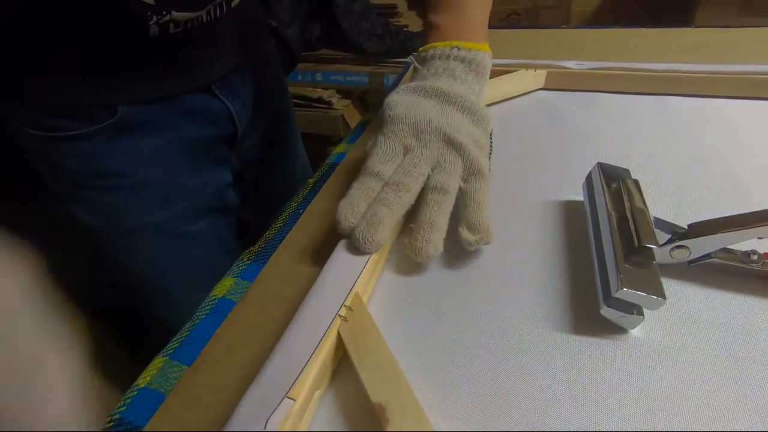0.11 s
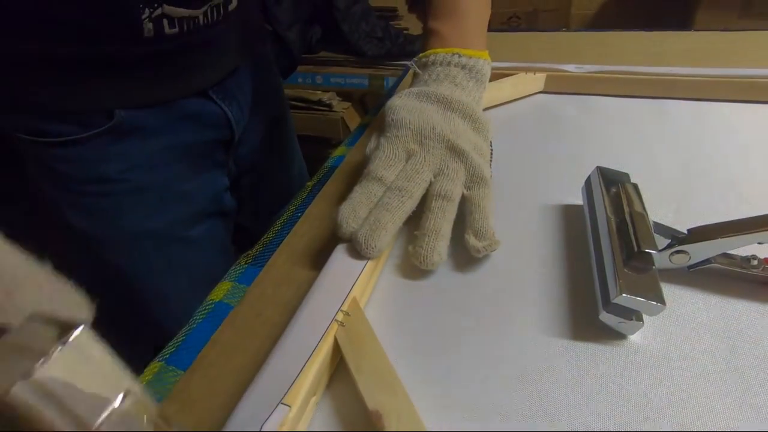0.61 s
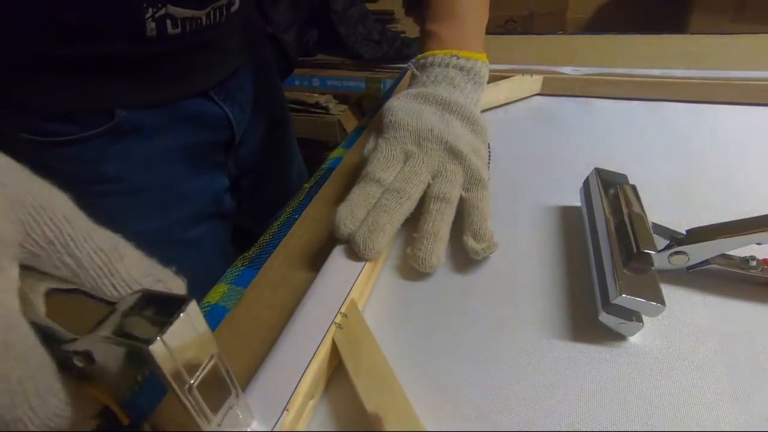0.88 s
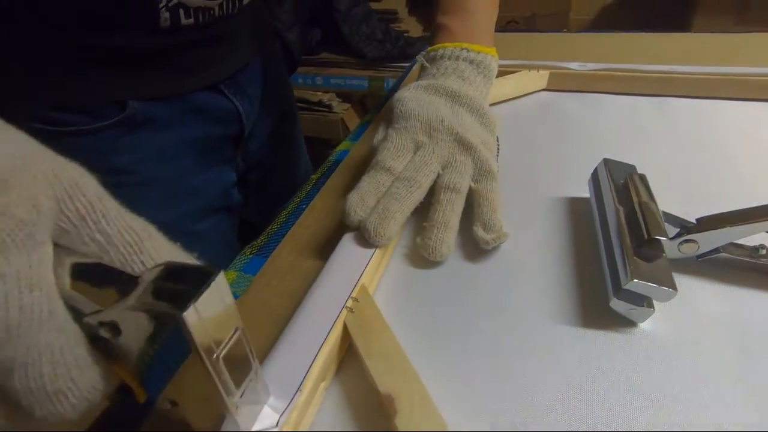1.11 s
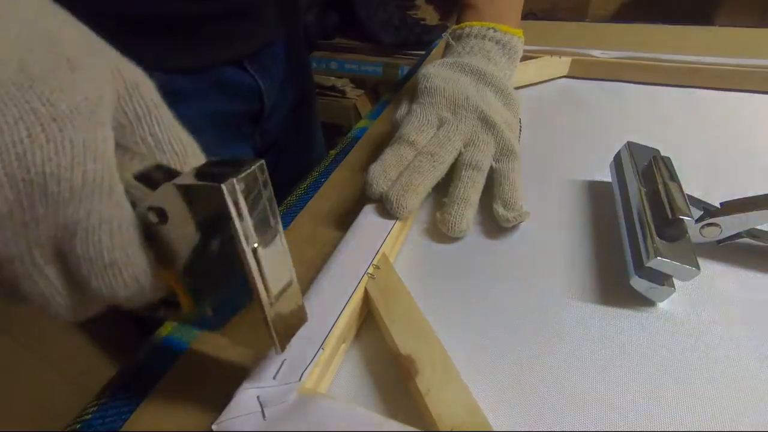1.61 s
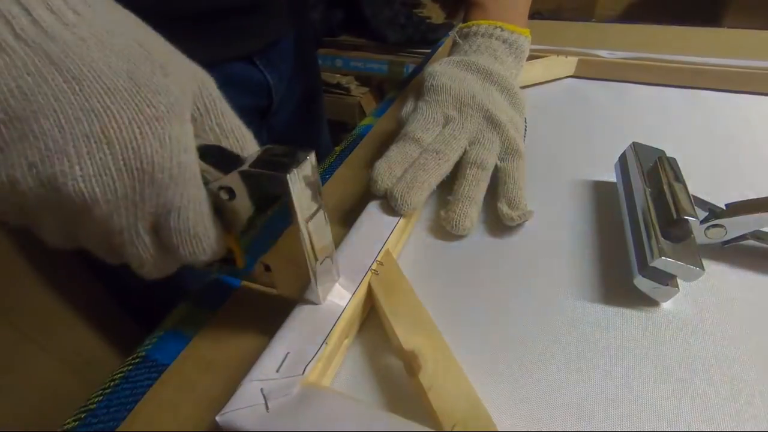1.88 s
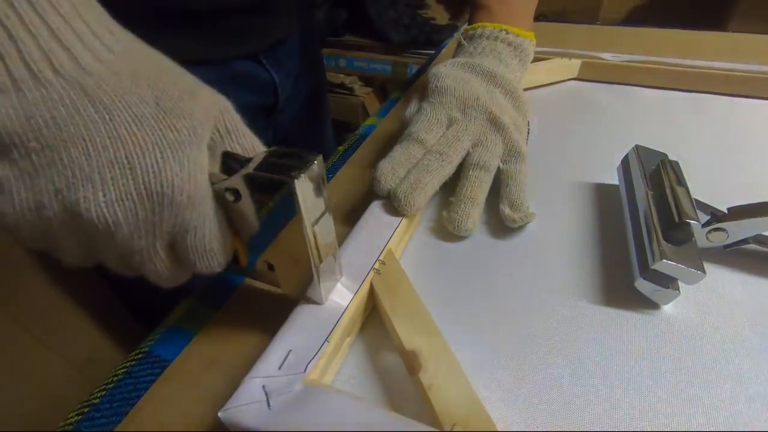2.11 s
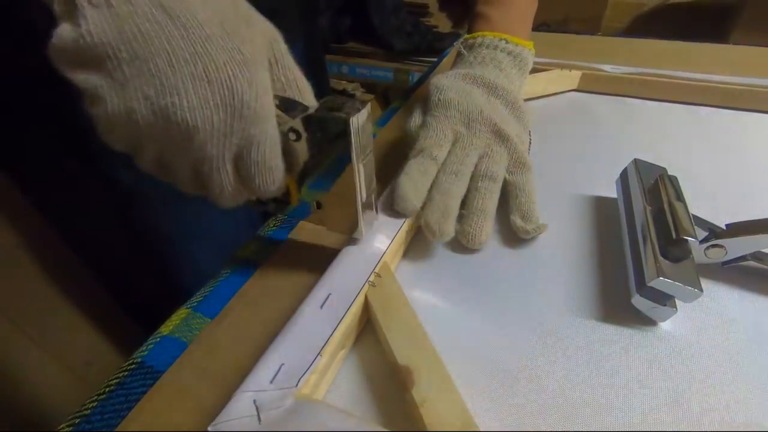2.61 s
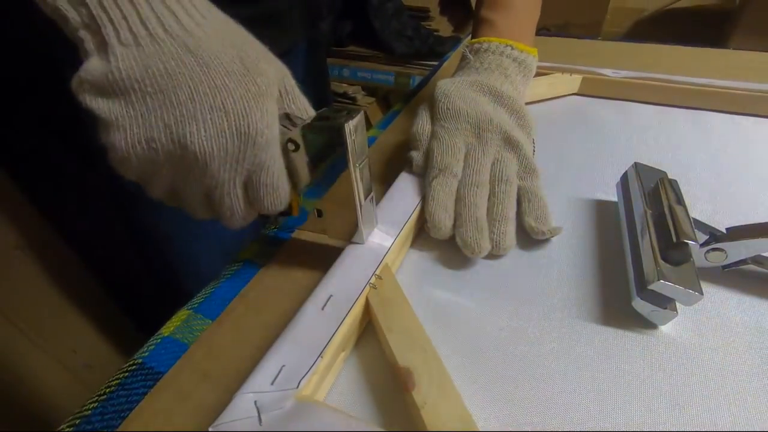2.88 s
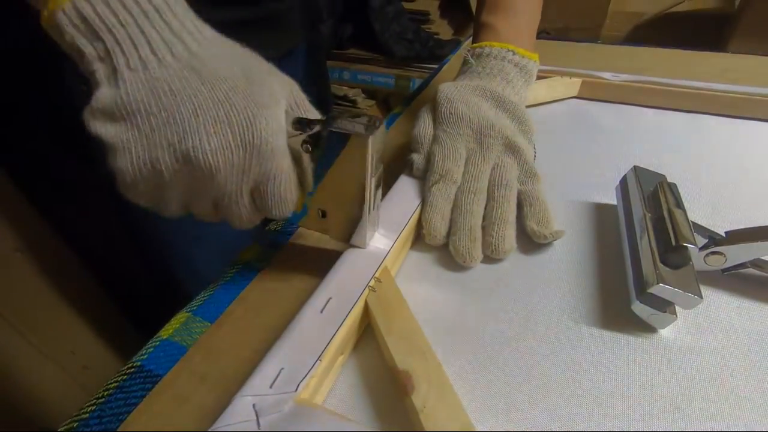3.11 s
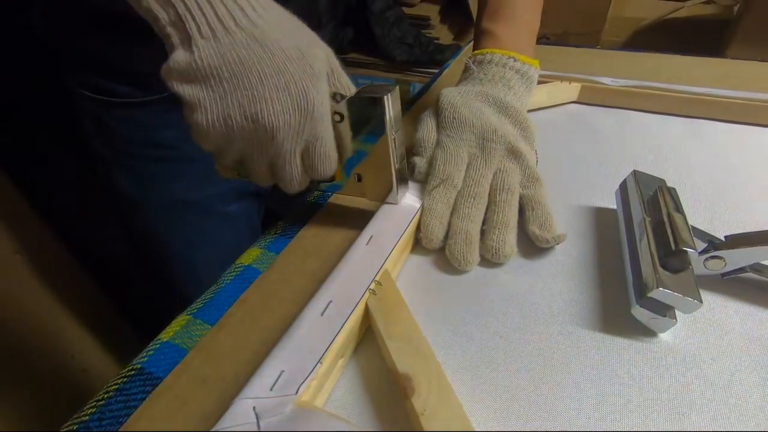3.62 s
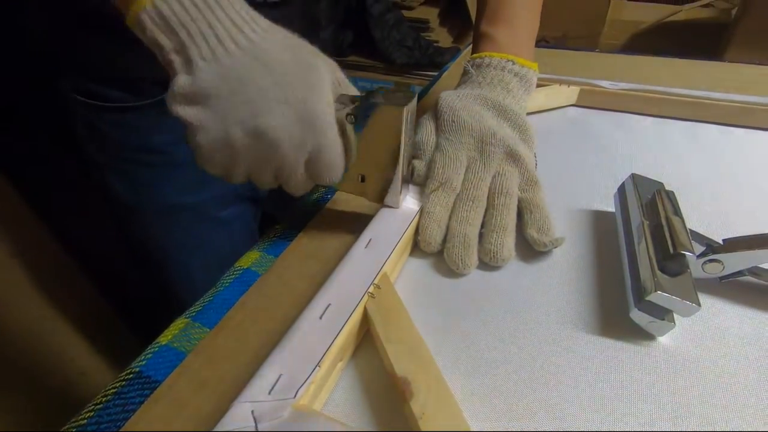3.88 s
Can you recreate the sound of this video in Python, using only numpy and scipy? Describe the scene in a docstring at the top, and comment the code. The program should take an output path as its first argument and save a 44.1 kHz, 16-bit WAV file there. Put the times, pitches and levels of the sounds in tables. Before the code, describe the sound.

A hand staple gun fires four loud, sharp cracks into a wooden frame, with metallic clicks between.

```python
"""In a faintly echoing room, close to a small recorder, a hand stapler is worked on a wooden frame on a table.
It is set down, squeezed, fired and let go, four times. Each shot is a shaped noise crack, ringing table modes
and a dying hiss; metal clicks are gritty bursts, landings ring the table, the lever scrape rings metal modes.
Gloves and cloth rustle as coloured grains, with a falling squeak and narrow creaks; deep swings shake the
recorder. A machine hums as wavering sines over room air, and decaying noise tails answer the work."""
import sys
import numpy as np
from scipy import signal
from scipy.fft import rfft, irfft
from scipy.io import wavfile
from scipy.ndimage import uniform_filter1d

SR = 44100
rng = np.random.default_rng(int(sys.argv[2]) if len(sys.argv) > 2 else 0)


def volts_from_decibels(level):
    """Turn decibel levels (scalar or array-like) into linear amplitude factors."""
    exponent = np.asarray(level, float) / 20
    return 10 ** exponent


def to_wav(s):
    """Save 16-bit WAV."""
    ch = np.atleast_2d(s).T  # columns
    pcm = np.round(np.clip(ch, -1, 1) * 32767)  # PCM
    wavfile.write(sys.argv[1], SR, pcm.astype(np.int16))


N = 176400


def curve(rows, t):
    """Straight lines through (s, dB) rows."""
    rows = np.array(rows, float)
    return np.interp(t, rows[:, 0], rows[:, 1])


def colour(x, table):
    """Filter by (Hz, dB) points on a log frequency axis, then scale to rms 1."""
    rows = np.array(table, float)
    hz = np.arange(N // 2 + 1) * SR / N + 1
    gain = volts_from_decibels(np.interp(np.log(hz), np.log(rows[:, 0] + 1), rows[:, 1]))
    y = irfft(rfft(x) * gain, N)
    return y / np.std(y)


def band(x, hz, width_hz):
    """Two-pole resonance that passes one band."""
    return signal.lfilter(*signal.iirpeak(min(hz, .44 * SR), max(hz / width_hz, .3), fs=SR), x)


def decay(t, t60):
    """Exponential decay that falls 60 dB in t60 seconds."""
    return 1000. ** (-t / t60)


def add(out, x, s):
    """Mix x in at time s."""
    i = int(s * SR)
    out[i:i + len(x)] += x[:N - i]


def grains(t, curves, table, grain_db, patchy_db):
    """Friction as dense tiny grains of uneven strength, in 2 ms patches, following level curves."""
    patch = np.repeat(rng.standard_normal(N // 88 + 1), 88)[:N]
    noise = rng.standard_normal(N) * volts_from_decibels(grain_db * rng.exponential(1, N) + patchy_db * patch)
    gain = 0
    for rows in curves:
        fade_in, fade_out = (rows[0][0] - .01, -100), (rows[-1][0] + .017, -100)
        gain = gain + volts_from_decibels(curve([fade_in] + list(rows) + [fade_out], t))
    return colour(noise, table) * gain


# hum of the machine, before it wavers: pitch_hz, level_db (rms)
HUM = [(140.0, -65), (193.8, -49), (290.7, -68)]
# spectrum of the room air: freq_hz, relative_db
AIR = [(15, -66.5), (25, -15.5), (109, -24), (202, -12.5), (286, -22.5), (475, -35), (655, -29),
       (1000, -42.5), (8780, -55.5), (15000, -70.5)]
# gain of the whole background, which sinks around the first shot and later returns: time_s, gain_db
BACKGROUND = [(0, -1), (.6, -1.5), (1.4, -1), (1.8, -10), (1.93, -13.5), (2.2, -5.5), (2.7, -5.5),
              (3.0, -7.5), (3.5, -15), (3.75, -2.5), (4, -3)]


def background(t):
    """Machine hum wavers alike in both channels, over partly separate room air on each side."""
    air_db, waver_db, side_share = -59, 2.8, 0.66
    steps = np.repeat(rng.standard_normal((2, N // 2205 + 1)), 2205, axis=1)
    waver = uniform_filter1d(steps, 4410, axis=1)[:, :N]
    drift_s = np.cumsum(0.001 * waver[1]) / SR
    hum = 0
    for hz, db in HUM:
        hum = hum + np.sqrt(2) * volts_from_decibels(db + waver_db * waver[0]) * np.sin(2 * np.pi * hz * (t + drift_s))
    mid, side = (colour(rng.standard_normal(N), AIR) for _ in range(2))
    air = volts_from_decibels(air_db) * (mid + side_share * side * np.array([[1], [-1]]))
    return (hum + air) * volts_from_decibels(curve(BACKGROUND, t))


# bands of the room's answer: freq_hz, t60_s, level_db (of the whole tail)
ROOM = [(307, 0.2, -19.5), (710, 0.85, -38.5), (1530, 0.17, -23), (3240, 0.5, -35), (4730, 0.66, -37),
        (7860, 0.87, -37.5), (11030, 0.53, -34)]


def room(x):
    """Reflections in each band form a decaying noise tail, a different one on each side."""
    t = np.arange(SR // 2) / SR
    tails = 0
    for hz, t60, db in ROOM:
        fade_in = np.clip(t / 0.008, 0, 1)
        tail = band(rng.standard_normal((2, len(t))), hz, hz) * decay(t, t60) * fade_in
        tails = tails + volts_from_decibels(db) * tail / np.sqrt(np.sum(tail ** 2) / 2)
    return signal.fftconvolve(tails, x[None], axes=1)[:, :N]


# deep bumps that shake the recorder: start_s, level_db (before the soft onset), pitch_hz
BUMPS = [(.0, -48, 44), (.365, -39, 42.5), (.41, -34.5, 50.8), (0.496, -37, 49), (1.042, -36.5, 43.2),
         (1.509, -31, 46.76), (2.329, -26.5, 41), (3.149, -27.5, 40.5), (3.884, -27.5, 38)]


def bumps():
    """Deep damped swings, stronger on the left, with a shifted phase on the right."""
    t60_s, onset_s, right_drop_db = 0.35, 0.0062, 3.1
    out, t = np.zeros((2, N)), np.arange(13230) / SR
    envelope = decay(t, t60_s) * (1 - np.exp(-t / onset_s))
    for (s, db, hz), shift in zip(BUMPS, rng.uniform(0.35, 1, len(BUMPS))):
        for side in range(2):
            swing = np.sin(2 * np.pi * hz * t + 0.62 * side * shift)
            add(out[side], volts_from_decibels(db - right_drop_db * side) * swing * envelope, s)
    return out


# rustle of glove and cloth, one list for each spell: time_s, level_db
CLOTH = [
    [(0, -59.5), (.06, -59), (.115, -51), (.14, -62), (.33, -65), (.37, -75), (.43, -76), (.48, -81),
     (.51, -77), (.55, -48.5), (.575, -84), (.63, -79), (.65, -64), (.7, -80)],
    [(.8, -49.5), (.87, -69), (.97, -79.5), (1.01, -48), (1.035, -66), (1.06, -52.5), (1.085, -62.5),
     (1.18, -88), (1.27, -74), (1.31, -75), (1.385, -65)],
]
# its spectrum: freq_hz, relative_db
CLOTH_COLOUR = [(290, -39.5), (500, -22.5), (694, 0), (935, -6), (1880, 0), (3610, -0.5), (11900, -9),
                (15000, -40)]


def cloth(t):
    """Glove and cloth rub in fine, mildly patchy grains."""
    return grains(t, CLOTH, CLOTH_COLOUR, grain_db=1.5, patchy_db=1.0)


def squeak(t):
    """A thin faint tone swells once while its pitch slides down."""
    start_s, end_s, peak_db = .415, .485, -65
    share = np.clip((t - start_s) / (end_s - start_s), 0, 1)
    pitch_hz = np.interp(share, (0, 1), (10000, 8200))
    swell = np.sqrt(np.sin(np.pi * share).clip(0))
    return volts_from_decibels(peak_db) * swell * np.sin(2 * np.pi * np.cumsum(pitch_hz) / SR)


# brief narrow creaks: middle_s, half_length_s, pitch_hz, level_db (rms at the middle)
CREAKS = [(1.28, .025, 3800, -66), (2.265, .025, 900, -54), (2.635, .03, 1720, -63)]


def creaks(t):
    """Narrow noise swells and fades smoothly."""
    out = 0
    for s, half, hz, db in CREAKS:
        hiss = band(rng.standard_normal(N), hz, hz / 14)
        out = out + volts_from_decibels(db) * hiss / np.std(hiss) * np.exp(-((t - s) / half) ** 2)
    return out


# scrape of lever and spring between the clicks, one list for each stroke: time_s, level_db
SCRAPE = [
    [(.345, -62), (.43, -56), (.53, -53), (.58, -64)],
    [(1.39, -43.5), (1.41, -45.5), (1.43, -36), (1.455, -56), (1.48, -35), (1.503, -40.5)],
    [(1.655, -67), (1.68, -41), (1.7, -49.5), (1.72, -33.5), (1.75, -48), (1.79, -65.5)],
    [(1.95, -79.5), (1.98, -59.5), (2.03, -73.5)],
    [(2.21, -68), (2.24, -57), (2.26, -43.5), (2.285, -58), (2.3, -49), (2.32, -48)],
    [(2.47, -53), (2.495, -64), (2.525, -29), (2.56, -50.5), (2.61, -63)],
    [(2.795, -51.5), (2.84, -57), (2.89, -72), (2.97, -70)],
    [(3.04, -79.5), (3.07, -59), (3.09, -44), (3.11, -44), (3.14, -38)],
    [(3.3, -66), (3.325, -45), (3.345, -33.5), (3.37, -46.5), (3.41, -63)],
    [(3.63, -58), (3.69, -70.5), (3.75, -73.5), (3.79, -60), (3.82, -47), (3.84, -56.5), (3.875, -49)],
]
# its spectrum: freq_hz, relative_db
SCRAPE_COLOUR = [(290, -51), (500, -31), (962, -13), (1680, 3.5), (3320, -3.5), (4230, 0.5), (5310, 4),
                 (8020, -6), (12300, -8.5), (15000, -38)]
# resonances of the lever, before each stroke varies them: pitch_hz, width_hz, level_db
LEVER = [(1580, 90, -10), (2700, 120, -9), (3700, 120, -13), (8100, 400, -12)]


def lever(t):
    """The scrape rings the metal of the lever; the grip shifts each resonance from stroke to stroke."""
    pitch_spread, level_spread_db = .1, 4
    scrape = grains(t, SCRAPE, SCRAPE_COLOUR, grain_db=2.2, patchy_db=3.2)
    out = scrape
    for rows in SCRAPE:
        stroke = scrape * (t > rows[0][0] - .01) * (t < rows[-1][0] + .02)
        shifts, louds = rng.uniform(-1.3, 1, (2, len(LEVER)))
        for (hz, width, db), shift, loud in zip(LEVER, shifts, louds):
            rung = band(stroke, hz * (1 + pitch_spread * shift), width)
            out = out + volts_from_decibels(db + level_spread_db * loud) * np.sqrt(hz / width) * rung
    return out


# modes of table and frame, before any tilt: pitch_hz, level_db, t60_s
TABLE = [(125.9, 4, 0.5), (142.7, -11.5, 0.69), (186.5, 7, 0.061), (230, -18, 0.12), (337, -19, 0.13),
         (401.5, -16.5, 0.13), (556, -23.5, 0.064), (751, -19, 0.039), (900, -21, 0.017),
         (1310, -18.5, .03)]


def ring_table(push_s, tilt_db=0.):
    """A half-sine push rings the wood modes, tilted by dB per octave about 200 Hz; peak 1."""
    t = np.arange(22050) / SR
    n = max(push_s * SR, 2.)
    push = np.sin(np.pi * np.minimum(np.arange(int(n) + 1) / n, 1))
    body = 0
    for hz, db, t60 in TABLE:
        body = body + volts_from_decibels(db + tilt_db * np.log2(hz / 200)) * np.sin(2 * np.pi * hz * t) * decay(t, t60)
    y = signal.fftconvolve(body, push)[:len(t)]
    return y / np.abs(y).max()


# the gun lands on the frame or rocks off it:
# start_s, peak_db (of the wood ring), tilt_db_per_octave, crunch_hz, crunch_db (relative to the ring)
THUMPS = [(1.392, -33.5, 10, 750, 0), (1.493, -27.5, 4.5, 750, 3), (1.66, -33, 2, 292, -3),
          (1.981, -22, 9.5, 600, -18), (2.473, -31, 8, 800, -7.5), (2.801, -16, 13, 850, -10),
          (3.131, -27.5, 5.5, 700, 1), (3.637, -15.5, 9, 358, -20)]


def thumps():
    """Soft landings ring the table, with a dull noise crunch of wood."""
    push_s, crunch_t60_s = 0.0024, .05
    out, t = np.zeros(N), np.arange(4410) / SR
    for s, db, tilt_db, hz, crunch_db in THUMPS:
        add(out, volts_from_decibels(db) * ring_table(push_s, tilt_db), s)
        burst = rng.standard_normal(len(t)) * decay(t, crunch_t60_s)
        crunch = band(band(burst, hz, 0.7 * hz), hz, 2 * hz)
        add(out, volts_from_decibels(db + crunch_db) * crunch / np.abs(crunch).max(), s)
    return out


# clicks of lever, spring and staples: start_s, level_db (peak of the middle resonance), centre_hz,
# treble_db (relative to the middle), t60_s (of the grit, 4 ms at least), knock_db (peak into the table)
CLICKS = [(0.115, -40.5, 2160, -5, 0.014, -69), (0.3614, -40.5, 1400, -15, 0.021, -35.5),
          (0.398, -32.5, 1580, -3, 0.045, -76), (0.4918, -30, 1190, -12.5, 0.016, -33.5),
          (0.5456, -33.5, 1670, -10, 0.062, -39.5), (0.8039, -28.5, 2200, -30, 0.0095, -84),
          (0.9858, -33.5, 2840, -0.5, 0.01, -49), (1.0043, -37, 2372, -8.5, 0.08, -41.5),
          (1.3166, -50.5, 2606, 7.5, 0.009, -52.5), (1.3416, -50.5, 2412, 3.5, 0.013, -54.5),
          (1.3715, -43.5, 2230, -7.5, 0.012, -55), (1.388, -33, 2800, -6, 0.03, -45.5),
          (1.413, -23, 3320, 11.5, 0.0038, -26.5), (1.428, -25.5, 1718, 1.5, 0.0066, -28.5),
          (1.4633, -25, 1409, -11.5, 0.023, -27), (1.4751, -23, 1433, -2.5, 0.018, -20.5),
          (1.4896, -8.5, 3235, 7, 0.0048, -19.5), (1.513, -19.5, 1320, -8.5, 0.043, -17),
          (1.6761, -19, 2473, -14, 0.013, -35), (1.7142, -20, 2100, 3, 0.016, -57),
          (1.7285, -34, 1657, 9, 0.02, -60), (1.9505, -44.5, 2214, 0.5, 0.0086, -71),
          (1.9607, -42.5, 2296, -18.5, 0.017, -33), (1.9822, -50, 1993, -13.5, 0.015, -34),
          (2.2358, -37, 2387, 6.5, 0.017, -50), (2.2477, -28.5, 2325, 3, 0.017, -34),
          (2.2907, -29, 2278, -3, 0.045, -31.5), (2.2966, -21, 1260, 2.5, 0.018, -20.5),
          (2.3076, -9.5, 3500, -4, 0.014, -49.5), (2.3134, -18, 1666, -6, 0.005, -18),
          (2.3322, -38.5, 2220, 2.5, 0.013, -12), (2.4892, -29, 2580, 2, 0.044, -27.5),
          (2.5198, -16, 1944, 2.5, 0.022, -45.5), (2.5406, -30, 1710, 8.5, 0.0057, -36.5),
          (2.5588, -34, 1740, 3, 0.018, -40.5), (2.6721, -35, 3660, -14.5, 0.012, -45.5),
          (2.7002, -45, 4425, -9, 0.014, -53.5), (2.7923, -38, 3000, -10, 0.0058, -35),
          (2.8361, -27.5, 3960, -24.5, 0.025, -25.5), (2.9158, -41, 2217, 1, 0.016, -45),
          (2.9525, -42, 4440, -17.5, 0.014, -50.5), (3.0697, -26.5, 2130, 5, 0.024, -40),
          (3.0834, -28, 2340, 7.5, 0.017, -29.5), (3.1135, -23, 1420, -2, 0.021, -21.5),
          (3.123, -12.5, 2597, -2, 0.022, -22), (3.3156, -31.5, 2442, 3, 0.02, -41),
          (3.3362, -22, 2920, 0, 0.044, -63.5), (3.3489, -35.5, 2714, 12, 0.029, -64),
          (3.3627, -27, 2160, -6, 0.0146, -44), (3.6302, -37.5, 2386, -15, 0.0058, -25),
          (3.684, -36, 2790, -0.5, 0.02, -49), (3.782, -40, 2320, -13, 0.019, -40),
          (3.8035, -26, 2470, 0.5, 0.016, -39.5), (3.816, -32, 3000, 2, 0.018, -32.5),
          (3.8474, -15.5, 2900, -9, 0.027, -24), (3.8653, -17, 3160, 4, 0.031, -19)]


def clicks():
    """Metal contact: gritty bursts in a middle and a treble resonance, each with a knock on the table."""
    treble_hz, treble_width_hz, onset_s = 6800, 2200, .0003
    # the table answers late and dies under the hand
    knock_lag_s, hand_t60_s = .004, .25
    out, t = np.zeros(N), np.arange(4410) / SR
    knock = ring_table(0.001) * decay(np.arange(22050) / SR, hand_t60_s)
    for s, db, hz, treble_db, t60, knock_db in CLICKS:
        noise, unevenness = rng.standard_normal((2, len(t)))
        envelope = decay(t, max(t60, .004)) * (1 - np.exp(-t / onset_s))
        grit = noise * volts_from_decibels(4 * unevenness) * envelope
        mid = band(band(grit, hz, hz), hz, 1.4 * hz)
        treble = band(np.diff(grit, prepend=0), treble_hz, treble_width_hz)
        click = mid / np.abs(mid).max() + volts_from_decibels(treble_db) * treble / np.abs(treble).max()
        add(out, volts_from_decibels(db) * click, s)
        add(out, volts_from_decibels(knock_db) * knock, s + knock_lag_s)
    return out


# shots: start_s, crack_db (peak), boom_db (peak), boosted_hz (stressed part of the crack),
# held_s (time from the start of the boom until the gun lifts)
SHOTS = [(1.5047, 10, -6, 779, 0.195), (2.323, 4.5, -11, 1698, 0.15), (3.1413, 1.5, -10, 2365, 0.2),
         (3.8801, 5, -10, 2020, .195)]
# spectrum of the striker's crack, before the boost: freq_hz, relative_db
CRACK = [(240, -30.5), (400, -1), (2630, -5), (5480, -3), (6580, -16.5), (8150, -11.5), (9650, -10.5),
         (10600, -23.5), (12500, -11), (14400, -22), (15500, -44)]
# spectrum of the hiss after a shot, spring rattle and near walls: freq_hz, relative_db
AFTER = [(180, -27.5), (300, 8), (637, -23.5), (763, -10), (991, -13), (3070, -4), (10100, -21),
         (12300, -30.5), (15000, -54.5)]


def shots():
    """The striker cracks for a few ms and drives the table, which rings until the gun lifts; a hiss dies away."""
    rise_s, fall_s, push_s, lift_t60_s = 0.0024, 0.0015, 0.001, 0.022
    boost_db, boost_width_octaves = 10, 0.25
    bite_s, bite_width_s, bite_db = .0022, .0003, 9
    hiss_db, hiss_t60_s = -43.5, 0.62
    out, t = np.zeros(N), np.arange(22050) / SR
    short = t[:1024]
    hiss = colour(rng.standard_normal(N), AFTER)
    hz, rows = np.arange(513) * SR / 1024 + 1, np.array(CRACK, float)
    crack_db = np.interp(np.log(hz), np.log(rows[:, 0]), rows[:, 1])
    shape = np.exp(-short / fall_s) * (1 - np.exp(-short / rise_s)) ** 2
    # the staple bites the wood: a brief swell inside the crack
    bite = volts_from_decibels(bite_db * np.exp(-((short - bite_s) / bite_width_s) ** 2))
    for k, (s, db, boom_db, boosted_hz, held) in enumerate(SHOTS):
        boost = boost_db * np.exp(-(np.log2(hz / boosted_hz) / boost_width_octaves) ** 2)
        burst = rfft(shape * rng.standard_normal(1024))
        # the root evens out the random spectrum
        evened = burst / np.sqrt(np.abs(burst))
        crack = bite * np.sqrt(shape) * irfft(volts_from_decibels(crack_db + boost) * evened)
        add(out, volts_from_decibels(db) * crack / np.abs(crack).max(), s)
        boom = ring_table(push_s) * decay(np.maximum(t - held, 0), lift_t60_s)
        add(out, volts_from_decibels(boom_db) * boom, s + 0.0025)
        after = hiss[k * len(t):(k + 1) * len(t)] * decay(t, hiss_t60_s)
        add(out, volts_from_decibels(hiss_db) * after, s + .003)
    return out


# phase by which the left microphone port leads the right: freq_hz, lead_radians
PORTS = [(100, .2), (700, .55), (1400, .65), (2800, .85), (4000, 1.8), (5600, 2.3), (8000, 1.8),
         (11000, 1.1), (15000, .8)]


def two_ports(x):
    """Near sound reaches the left port first, as a phase lead; the left is half a dB weaker."""
    left_over_right_db = -0.5
    rows = np.array(PORTS)
    half_lead = np.interp(np.arange(N // 2 + 1) * SR / N, rows[:, 0], rows[:, 1]) / 2
    ports = []
    for side in (1, -1):
        shifted = irfft(rfft(x) * np.exp(1j * side * half_lead), N)
        ports.append(shifted * volts_from_decibels(side * left_over_right_db / 2))
    return np.array(ports)


def scene():
    """The near work at both ports, the room's answer, the background and the shaking of the recorder."""
    shot_room_db = -7.5  # shots feed the room less than the small sounds do
    t = np.arange(N) / SR
    low_cut = signal.butter(3, 72.6, "high", fs=SR)
    fired = signal.lfilter(*low_cut, shots())
    small = signal.lfilter(*low_cut, clicks() + thumps())
    small = small + lever(t) + cloth(t) + squeak(t) + creaks(t)
    answer = room(small + volts_from_decibels(shot_room_db) * fired)
    return two_ports(fired + small) + answer + background(t) + bumps()


def roll_off(x):
    """The treble ends steeply here."""
    return signal.sosfilt(signal.butter(12, 15750, fs=SR, output="sos"), x)


def record(dry):
    """The microphone dulls the top, the loudest peaks clip, and a steep low-pass follows."""
    dulled = signal.sosfilt(signal.butter(3, 10740, fs=SR, output="sos"), dry)
    clipped = np.clip(dulled, -1, 1)
    mix = signal.sosfilt(signal.ellip(6, .2, 50, 15700, fs=SR, output="sos"), clipped)
    return roll_off(mix)


dry = scene()
out = record(dry)
to_wav(out)
```